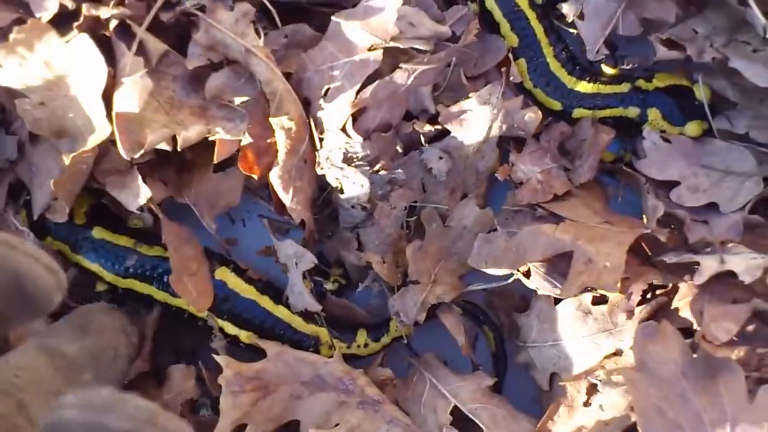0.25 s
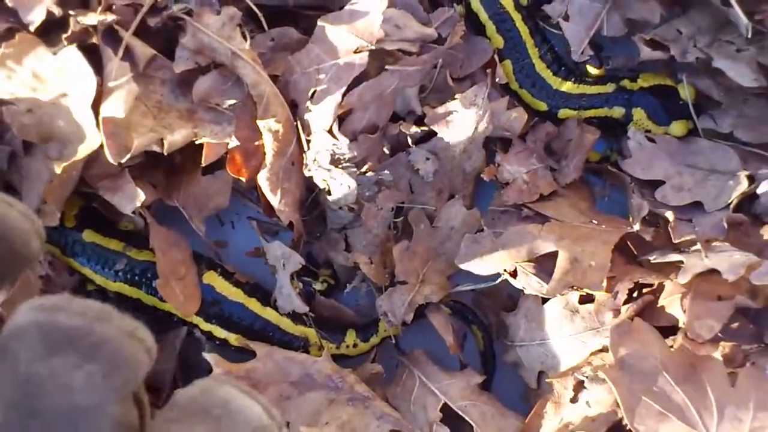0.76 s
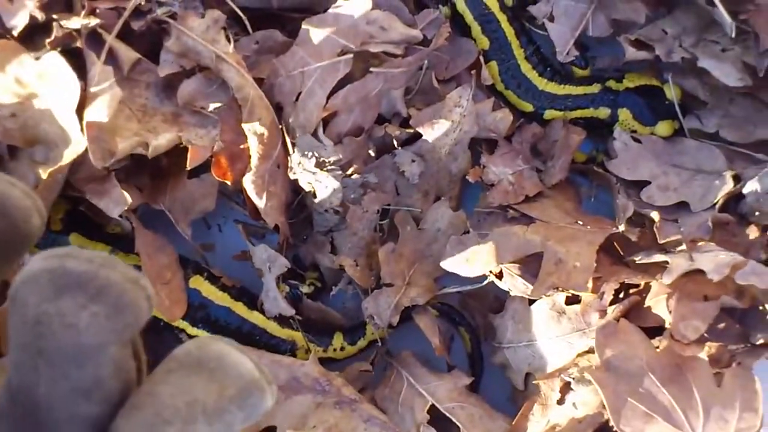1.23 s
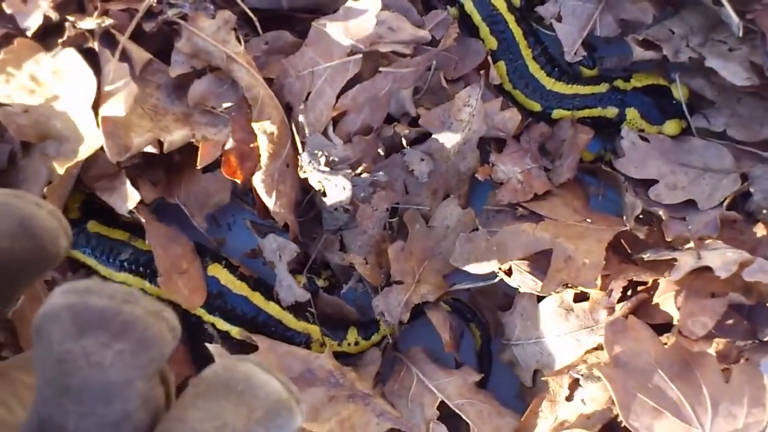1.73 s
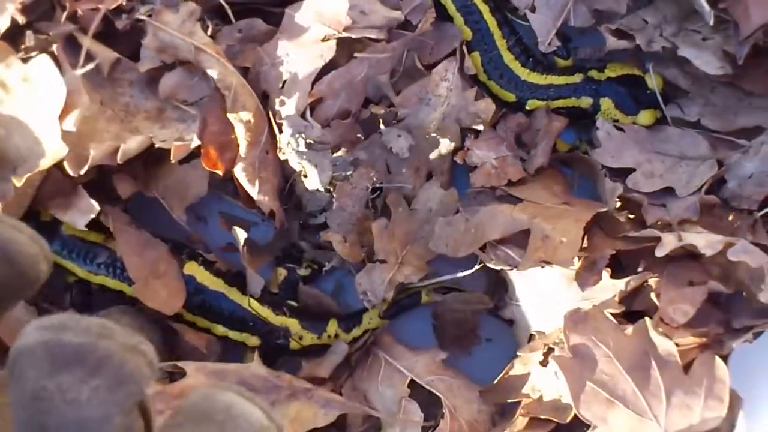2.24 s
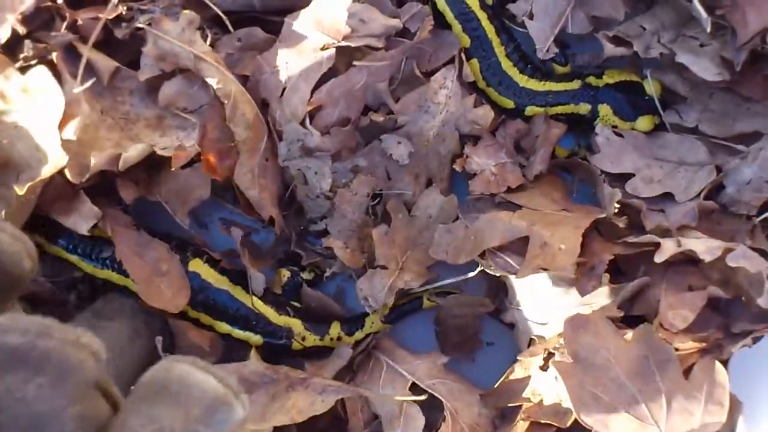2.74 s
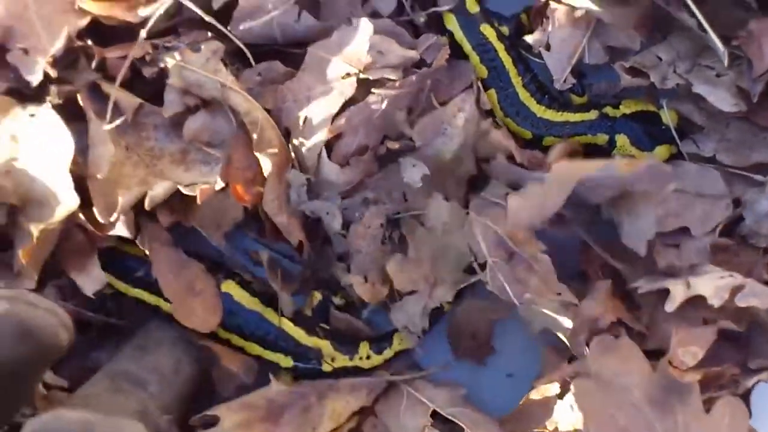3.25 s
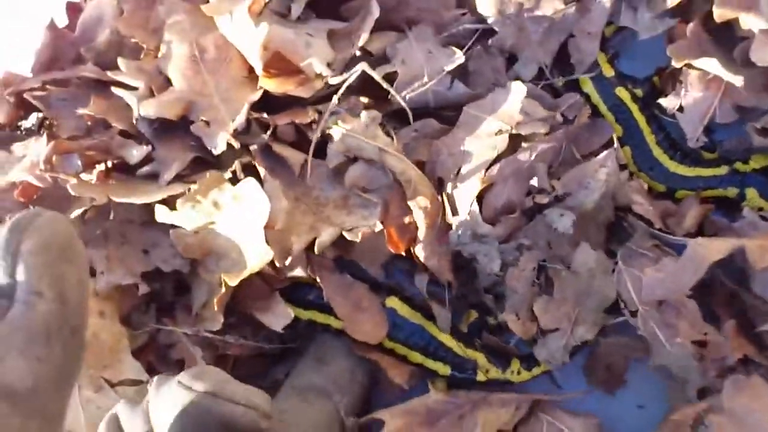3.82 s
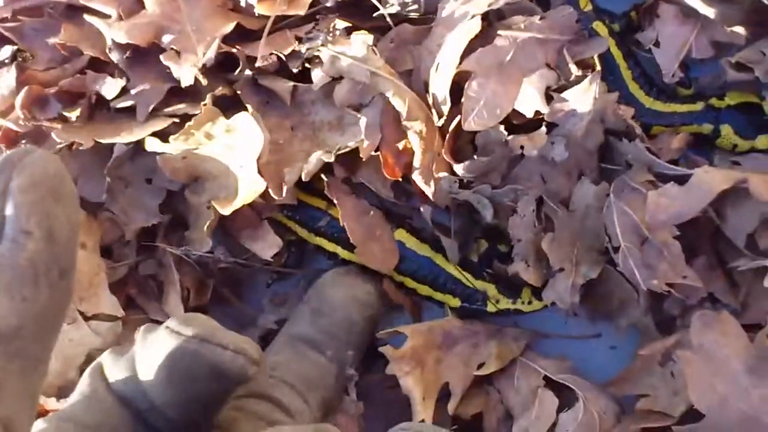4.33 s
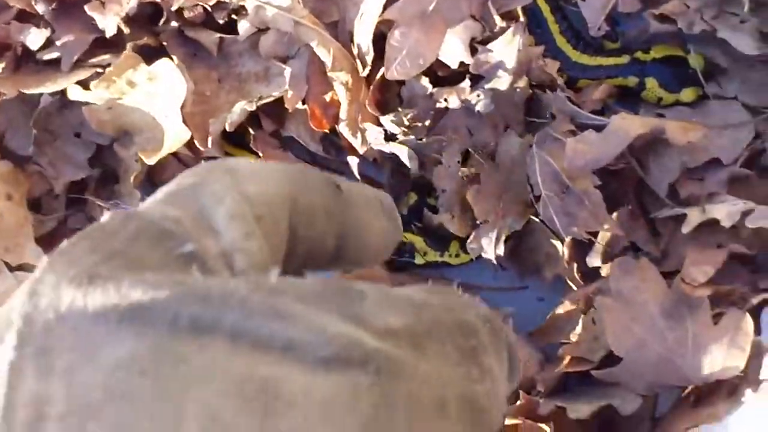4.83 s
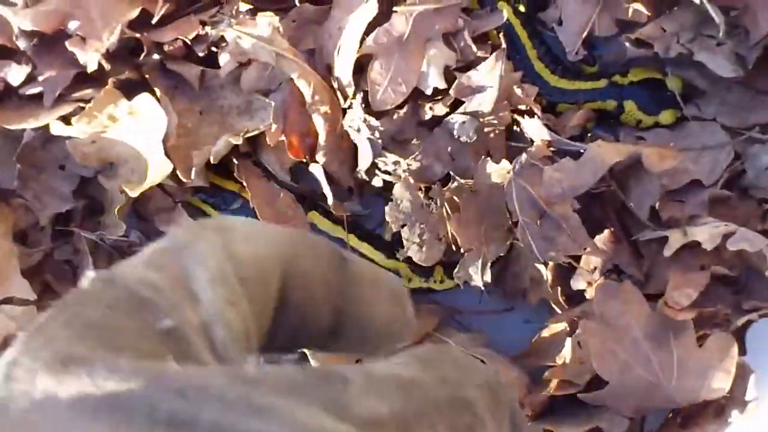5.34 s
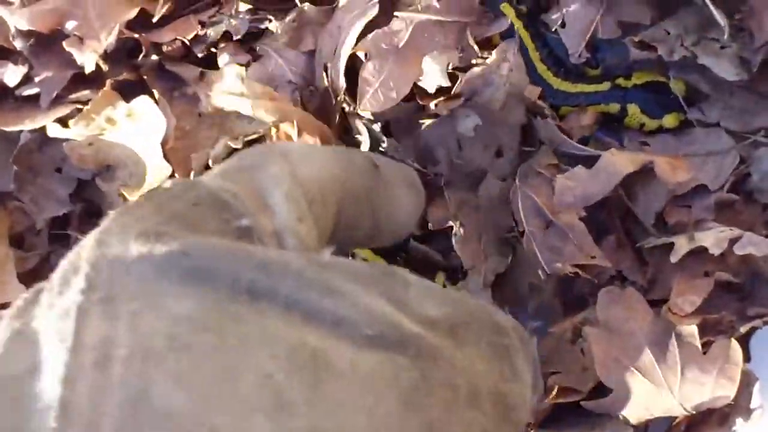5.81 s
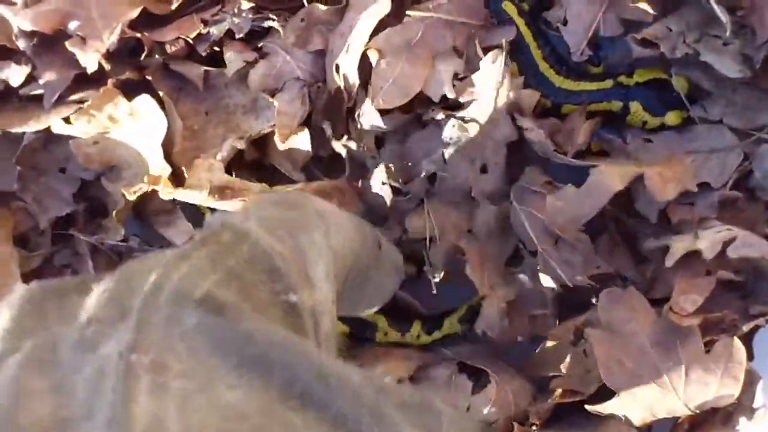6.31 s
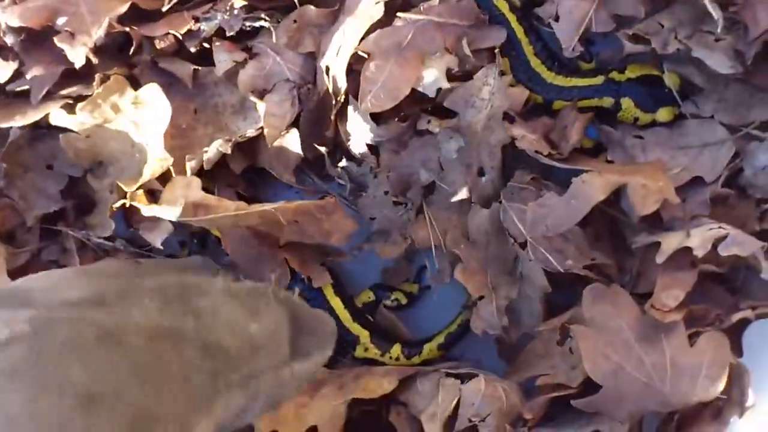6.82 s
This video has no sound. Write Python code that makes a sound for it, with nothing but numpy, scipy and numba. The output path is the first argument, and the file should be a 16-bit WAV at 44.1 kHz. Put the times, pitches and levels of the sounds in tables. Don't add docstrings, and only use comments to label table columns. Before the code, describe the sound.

Close, bright crunching of dry leaves in irregular sweeps, with sharp snaps and dull tub bumps, later quieter, with one faint bird whistle.

```python
import sys
import numpy as np
from scipy import signal
from scipy.fft import rfft, irfft
from scipy.io import wavfile
from scipy.ndimage import uniform_filter1d
from numba import njit

SR = 44100
rng = np.random.default_rng(int(sys.argv[2]) if len(sys.argv) > 2 else 0)


def level_to_linear(level):
    exponent = np.asarray(level, float) / 20
    return 10 ** exponent


def materialize(psi):
    bounded = np.clip(np.atleast_2d(psi).T, -1, 1)
    quanta = np.round(bounded * 32767).astype(np.int16)
    wavfile.write(sys.argv[1], SR, quanta)


N = 311787

PORT_LAG_S, LAG_SCATTER_S = 0.00012, 0.00008
ECHO_S, ECHO_DB = 0.0035, -7
LEFT_RIGHT = np.array([[0.5], [-0.5]])


def set_rms(x, db):
    return x * level_to_linear(db) / np.sqrt(np.mean(x ** 2))


def on_log_hz(table, hz):
    f, v = np.transpose(table)
    return np.interp(np.log(np.maximum(hz, 1)), np.log(np.maximum(f, 1)), v)


def colour(x, table, share=1):
    size = 8192
    hz = np.arange(size // 2 + 1) * SR / size
    cepstrum = irfft(np.log(level_to_linear(share * on_log_hz(table, hz))))
    cepstrum[1:size // 2] *= 2
    cepstrum[size // 2 + 1:] = 0
    impulse = irfft(np.exp(rfft(cepstrum)))
    return signal.fftconvolve(x, impulse)[:N]


def walk(rate_hz):
    hold = int(SR / rate_hz)
    steps = np.repeat(rng.standard_normal(N // hold + 1), hold)
    smooth = uniform_filter1d(uniform_filter1d(steps, hold), hold)[:N]
    return smooth / smooth.std()


@njit
def rings(at, hz, fall, gain, n):
    out = np.zeros(n + 1)
    for k in range(len(at)):
        first = int(at[k]) + 1
        turn = np.exp(2j * np.pi * hz[k] - fall[k])
        z = gain[k] * np.exp((2j * np.pi * hz[k] - fall[k]) * (first - at[k]))
        for j in range(max(first, 0), min(first + int(6 / fall[k]), n)):
            out[j] += z.real
            z *= turn
    return out[:n]


def strike(start_s, hz, t60_s, gain, pan_db, lag_s, echoes=2):
    pitch = hz / SR
    fall = np.log(1000) / (t60_s * SR)
    left = start_s, gain * level_to_linear(pan_db / 2)
    right = start_s + lag_s, gain * level_to_linear(-pan_db / 2)
    out = np.zeros((2, N))
    for port, (start, size) in enumerate([left, right]):
        out[port] = rings(start * SR, pitch, fall, size, N)
        for late in rng.random((len(start_s), echoes)).T:
            echo_gain = size * level_to_linear(ECHO_DB - 2 * late)
            out[port] += rings((start + ECHO_S * late) * SR, pitch, fall, echo_gain, N)
    return out


# peak_s [s], rustle_db [dB], swell_s [s], fade_s [s]
HAND_PUSHES = [(0.176, -28, 0.12, 0.038), (.58, -24, .1, 0.11), (.783, -28, .115, 0.11),
               (.914, -27, .055, .045), (1.078, -36.5, .3, .05), (1.132, -37.5, 0.049, 0.091),
               (1.239, -37, 0.12, .22), (1.481, -33.5, .1, .1), (1.587, -37, .16, 0.33),
               (2.062, -29, .06, .2), (2.211, -30, 0.11, 0.11), (2.509, -35, .05, 0.24),
               (2.596, -35, .06, 0.044), (2.715, -36.5, 0.14, .07), (3.038, -33.5, .35, .5),
               (3.191, -23.5, .045, 0.17), (3.34, -39, 0.12, .4), (3.669, -41, 0.062, 0.16),
               (3.773, -37, .036, 0.086), (3.986, -22.5, .18, .14), (4.161, -35, 0.46, .05),
               (4.31, -38.5, .1, .07), (4.401, -43.5, 0.063, .07), (5.051, -32, 0.093, .15),
               (5.589, -37, .027, .2), (5.738, -32.5, .14, .1), (5.836, -31, .043, .14),
               (5.996, -37.5, 0.15, .1), (6.448, -26, .15, .14), (6.78, -36, .15, 0.062)]
# start_s [s], length_s [s], rustle_db [dB]
GLOVE_DRAGS = [(0, 0.12, -32), (0.229, .174, -35.5), (0.508, .42, -48), (0.949, .06, -40),
               (.73, 0.046, -35.5), (1.113, .25, -49.5), (1.413, 1.7, -44), (3.448, .36, -49.5),
               (4.421, 0.056, -52.5), (4.524, 0.24, -62), (4.934, 0.043, -54), (5.123, .1, -40.5),
               (5.22, .08, -47), (6.093, .09, -54.5), (0.548, .07, -29), (0.802, .04, -32),
               (2.3, 0.19, -44), (2.743, .1, -44), (4.204, 0.058, -47), (0.199, .02, -44.5),
               (1.948, .09, -36), (5.591, .4, -51), (6.177, 0.15, -41.5), (6.601, .3, -51),
               (6.976, .1, -42)]


def hand(t):
    peak_s, db, swell_s, fade_s = (c[:, None] for c in np.transpose(HAND_PUSHES))
    before = (peak_s - t) / np.maximum(swell_s, 0.01)
    after = (t - peak_s) / np.maximum(fade_s, 0.01)
    push_db = db - 20 * np.maximum(before, after) ** 0.97

    start_s, length_s, db = (c[:, None] for c in np.transpose(GLOVE_DRAGS))
    outside_s = np.maximum(np.maximum(start_s - t, t - start_s - length_s), 0)
    drag_db = db - 20 * outside_s / 0.025

    power = (level_to_linear(np.vstack([push_db, drag_db])) ** 2).sum(axis=0)
    rest_db = -91.5
    return 10 * np.log10(power + level_to_linear(rest_db) ** 2)


# start_s [s], body_minus_rustle_db [dB], left_minus_right_db [dB]
HAND_PLACE = [(0, -12.5, 4.5), (.55, -15, 3), (.9, -16, 4), (1.3, -14, 4.5), (1.9, -13, 2.5),
              (2.05, -23, 4.5), (2.2, -14, 5), (2.6, -9.5, 3), (3.1, -15, 5.5), (3.45, -12.5, 4),
              (3.95, -16, 2), (4.4, -12.5, 6), (5.05, -15, 6), (5.7, -20.5, 2.5), (6.3, -12, 3),
              (6.55, -13, 3.5), (6.9, -16.5, 3.5), (7.07, -10.5, 11)]


def hand_place(t):
    s, *columns = np.transpose(HAND_PLACE)
    return [np.interp(t, s, c) for c in columns]


def snap_scatter(rustle_db):
    crisp_db = -0.5 - 0.22 * (rustle_db + 36.5)
    return np.minimum(crisp_db, 6) * (rustle_db > -54)


def rustle(crisp_db, modes=3, snaps=16000):
    when, size, side = rng.random((snaps, 3)).T
    at = (when * (N - 1)).astype(int)
    excess = np.minimum(-np.log(1 - size), 5.0)
    flurry_db = 2.0 * walk(60) + 0.5 * walk(200)
    gain = level_to_linear(np.clip(crisp_db[at], 0, 7) * (excess - 1.92) + flurry_db[at])
    lag_s = PORT_LAG_S + LAG_SCATTER_S * 3.8 * (side - 0.5)
    pitch, ring = rng.random((2, modes, snaps))
    mode_hz = 100 + 17500 * pitch
    t60_s = 0.0015 * 8.4 ** ring
    out = np.zeros((2, N))
    for hz, t60 in zip(mode_hz, t60_s):
        out += strike(when * N / SR, hz, t60, gain / np.sqrt(t60), 0, lag_s)
    return out


# pitch_hz [Hz], level_db [dB per Hz]
LEAF_TONE = [(880, -23), (1500, -20), (1830, -89.5), (2400, -15.5), (3660, -6), (4430, -8), (6360, 0.5),
             (8770, 1.5), (9790, -1), (12800, -16.5), (15100, -22), (16000, -22), (16500, -66)]
# pitch_hz [Hz], left_minus_right_db [dB]
PORT_TONE = [(60, 1.5), (110, 3), (200, 6), (380, 3), (700, 6.5), (1290, 8), (2380, 14.5), (4400, -4),
             (8120, 3), (15000, 24.5)]


def leaf_hiss(snaps, rustle_db, pan_db):
    mean_pan_db = 6
    left = colour(colour(snaps[0], LEAF_TONE), PORT_TONE, 0.5)
    right = colour(colour(snaps[1], LEAF_TONE), PORT_TONE, -0.5)
    hiss = set_rms(np.array([left, right]), 0)
    return hiss * level_to_linear(rustle_db + (pan_db - mean_pan_db) * LEFT_RIGHT)


# pitch_hz [Hz], level_db [dB per Hz]
TUB_TONE = [(150, -40), (250, -21), (328, -7.5), (377, -10), (499, 0.5), (599, -6.5), (759, -5), (979, 1),
            (1850, -3), (2200, 3), (2860, -9.5), (4840, -120)]


def tub(x):
    mid = colour(x[0] + x[1], TUB_TONE)
    side = colour(x[0] - x[1], TUB_TONE)
    late_mid = np.roll(mid, int(PORT_LAG_S * SR))
    return np.array([mid + 0.056 * side, late_mid - 0.06 * side])


def tub_body(snaps, breaks, rustle_db, body_db):
    wall_db = 0.89 * (rustle_db + 43.0) - 44 + body_db
    return set_rms(tub(snaps), -4.0) * level_to_linear(wall_db) + level_to_linear(-38) * tub(breaks)


# pitch_hz [Hz], level_db [dB per Hz]
AIR_TONE = [(12, -32), (20, -2), (86, 3), (111, -1.5), (156, -10), (200, -10.5), (428, -20), (913, -19),
            (1470, -24), (4050, -27), (4530, -25.5), (9670, -26), (11500, -30), (15200, -32), (16500, -21)]


def air():
    air_db, whine_db, whine_hz, whine_width_hz = -56, -77, 13750, 120
    hz = np.arange(N // 2 + 1) * SR / N
    mid, side, whine = rfft(rng.standard_normal((3, N)))
    apart = np.clip(0.13 + (hz / 1100) ** 1.5, 0, 1)
    ports = mid + apart * side * np.array([[1], [-1]])
    far = irfft(ports * level_to_linear(on_log_hz(AIR_TONE, hz)), N)
    far = far * level_to_linear(1.0 * walk(1.5) + np.array([[-0.8], [0.8]]))
    far = far * level_to_linear(air_db) / far.mean(axis=0).std()
    whine = irfft(whine * np.exp(-((hz - whine_hz) / whine_width_hz) ** 2), N)
    return far + set_rms(whine, whine_db) * np.array([[1.3], [0.7]])


# start_s [s], peak_db [dB], left_minus_right_db [dB]
CRACKS = [(0.0159, -11, 0), (0.0473, -19, 6), (0.1161, -27, 7), (0.1446, -11.5, -1),
          (0.1645, -16, 3.5), (0.176, -11, -5), (0.1794, -12, 3), (0.2189, -13.5, -4),
          (0.2414, -18.5, 12), (0.2598, -18.5, -1), (0.2768, -19.5, 5), (0.3885, -21.5, 0),
          (0.5172, -19, 5), (0.5317, -11, 2), (0.6074, -15.5, 1.0), (0.7257, -18, -0.5),
          (0.7861, -11, 3), (0.9567, -20, 1.5), (1.0251, -13, 1), (1.073, -20.5, 4),
          (1.1283, -7.5, 0.5), (1.2196, -17, -2), (1.2301, -13, 2), (1.243, -15, -1),
          (1.3144, -17.5, 1), (1.3992, -21.5, 0), (1.4586, -19.5, -4), (1.4732, -19, 7),
          (1.514, -20.5, 2), (1.7287, -24, 0)]
# start_s [s], peak_db [dB], left_minus_right_db [dB]
LATER_CRACKS = [(1.7934, -15.5, 1), (1.9055, -22, -3), (2.05, -20, 8), (2.2972, -17.5, 1),
                (2.4916, -10, 1), (2.5018, -9.5, 3), (2.594, -23.5, 3), (2.7013, -18, 3),
                (2.7237, -9.5, -2), (2.9306, -20, 1), (2.9435, -15.5, 0), (2.971, -22, 3),
                (2.9858, -21, -7), (3.1707, -22, -2), (3.392, -23, 5), (3.441, -26, 10), (3.6107, -25, 3),
                (3.6885, -20.5, -0.5), (3.84, -21, 6), (3.9225, -22, 1.5), (4.026, -10.5, 5),
                (4.4752, -30.5, -2), (4.9335, -30.5, 2.5), (5.0185, -21, -5), (5.2976, -29.5, -2),
                (5.5822, -31, 0.5), (5.6408, -24, 10), (5.8253, -24, 6), (6.7012, -24.5, -2),
                (6.9664, -30.5, 1)]
# start_s [s], peak_db [dB], left_minus_right_db [dB]
FAINT_CRACKS = [(0.3984, -21, 1.0), (0.4298, -28, 2), (0.451, -29, 2), (0.7046, -27, 2), (1.0424, -27, 2.5),
                (1.0874, -24, 2), (1.1548, -34, 1.5), (1.3404, -30, 2.0), (1.3854, -44, -1),
                (1.4054, -34, 2.0), (1.8034, -23, 2.5), (1.838, -20.5, 4), (1.9704, -20.5, 2.5),
                (2.2717, -29, -4), (2.314, -23, -1.0), (2.3264, -24.5, 0.5), (2.5254, -17.5, 0),
                (2.5424, -21, 0.0), (2.624, -29, 1.0), (2.8558, -20.5, -1), (3.4087, -23, 7),
                (3.6556, -32, 3), (3.7623, -42, 2.0), (4.737, -39.5, 1.5), (4.9255, -33, 0), (5.248, -25, 3),
                (5.6267, -26.5, 2), (5.8872, -23, 3), (6.0514, -31, 5), (6.9222, -34.5, 0.5)]


def crack_rows(rustle_db, strays=45):
    busy = np.cumsum(level_to_linear(rustle_db / 2))
    when, size, side = rng.random((strays, 3)).T
    at = np.searchsorted(busy, when * busy[-1])
    stray_db = np.minimum(rustle_db[at] + 6.5, -20) + 8.5 * 2 * (size - 0.5)
    stray_pan_db = 0.5 * 2 * side
    stray_rows = np.transpose([at / SR, stray_db, stray_pan_db])
    rows = np.vstack([CRACKS, LATER_CRACKS, FAINT_CRACKS, stray_rows])
    start_s, db, pan_db = rows.T
    pitch_hz = 8050 * 2 ** (0.048 * rng.standard_normal(len(start_s)))
    return start_s, db, pitch_hz, pan_db


def cracks(rows, splits=16):
    crack_s = 0.0045
    start_s, db, hz, pan_db = (c[:, None] for c in rows)
    late, spread, ring, side = np.moveaxis(rng.random((len(start_s), splits, 4)), 2, 0)
    late = late ** 1.9
    pitch = np.clip(hz * 2 ** (1.34 * (spread - 0.5)), 4900, 16500)
    off_pitch_oct = abs(np.log2(pitch / hz))
    share_db = -10.5 * late - 2.8 * off_pitch_oct + 0.46 * on_log_hz(LEAF_TONE, pitch)
    share = level_to_linear(share_db) * np.sign(ring - 0.5)
    gain = level_to_linear(db + 3.5) * share / np.linalg.norm(share, axis=1, keepdims=True)
    t60_s = 0.0029 + 0.0013 * ring
    lag_s = PORT_LAG_S + LAG_SCATTER_S * 3.1 * (side[:, :1] - 0.5)
    parts = np.broadcast_arrays(start_s + crack_s * late, pitch, t60_s, gain, pan_db, lag_s)
    return strike(*(p.ravel() for p in parts))


def knocks(table, spread_oct, modes=7):
    start_s, db, hz, t60_s = (c[:, None] for c in np.transpose(table))
    late, off = np.moveaxis(rng.random((len(start_s), modes, 2)), 2, 0)
    mode_s = start_s + 0.00323 * late * spread_oct / 2
    mode_hz = hz * 2 ** (spread_oct * (off - 0.5))
    parts = np.broadcast_arrays(mode_s, mode_hz, t60_s, level_to_linear(db) / np.sqrt(modes))
    hard = strike(*(p.ravel() for p in parts), 0, PORT_LAG_S, echoes=0)
    return uniform_filter1d(hard, size=5)


# start_s [s], peak_db [dB], ring_hz [Hz], t60_s [s]
FINGER_BUMPS = [(1.228, -37.5, 560, 0.022), (1.235, -37.5, 510, 0.017), (2.219, -48, 546, 0.018),
                (2.49, -36.5, 500, 0.029), (2.551, -44, 580, 0.036), (2.574, -41, 454, 0.026),
                (2.72, -39.5, 467, 0.055), (3.231, -36, 559, 0.019), (3.687, -40.5, 1130, 0.037),
                (4.29, -44, 523, 0.015), (6.766, -48, 552, 0.014), (6.773, -41, 304, 0.03),
                (6.781, -38, 265, 0.057), (6.82, -52, 275, 0.017), (6.86, -51, 346, 0.04),
                (7.029, -37.5, 560, 0.012)]


def finger_bumps():
    return knocks(FINGER_BUMPS, 2.43)


# start_s [s], peak_db [dB], ring_hz [Hz], t60_s [s]
SMALL_TICKS = [
    (4.765, -41, 3450, .026),
    (4.855, -44, 2250, .022),
    (6.757, -40, 1800, .018),
    (6.767, -39, 290, .07),
    (6.982, -48, 1900, .02),
    (7.031, -44, 1150, .02),
    (7.033, -45, 520, .045),
]


def small_ticks():
    return knocks(SMALL_TICKS, 0, modes=1)


# start_s [s], pitch_hz [Hz], level_db [dB]
BIRD_WHISTLE = [
    (6.12, 2150, -66),
    (6.15, 2400, -62),
    (6.18, 2560, -60),
    (6.21, 2500, -62),
    (6.24, 2540, -62),
]


def bird():
    s, hz, db = np.transpose(BIRD_WHISTLE)
    t = np.arange(N) / SR
    level_db = np.interp(t, s, db) + 4 + walk(50)
    edge = np.clip(np.minimum(t - s[0], s[-1] - t) / 0.0084, 0, 1)
    phase = 2 * np.pi * np.cumsum(np.interp(t, s, hz)) / SR
    return np.sqrt(2) * edge * level_to_linear(level_db) * np.sin(phase)


def scene():
    t = np.arange(N) / SR
    rustle_db = np.interp(t, t[::32], hand(t[::32]))
    body_db, pan_db = hand_place(t)
    snaps = rustle(snap_scatter(rustle_db))
    breaks = cracks(crack_rows(rustle_db))
    hiss = leaf_hiss(snaps, rustle_db, pan_db)
    body = tub_body(snaps, breaks, rustle_db, body_db)
    return hiss + body + air() + breaks + finger_bumps() + small_ticks() + bird()


def band_limit(x):
    return signal.sosfilt(signal.butter(12, 16990, fs=SR, output="sos"), x)


def record(dry):
    top_cut = signal.ellip(10, 0.3, 30, 15950, fs=SR, output="sos")
    mix = signal.sosfilt(top_cut, dry)
    return band_limit(mix)


dry = scene()
out = record(dry)
materialize(out)
```